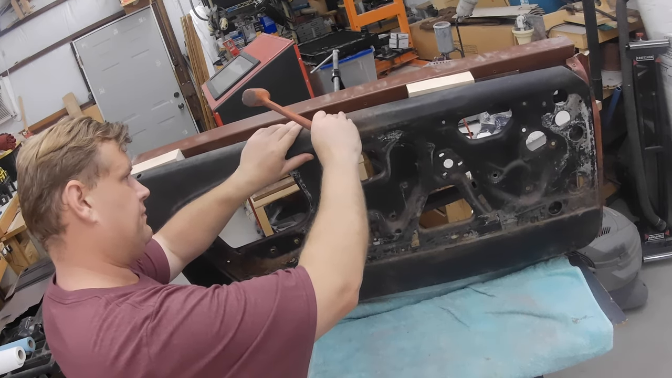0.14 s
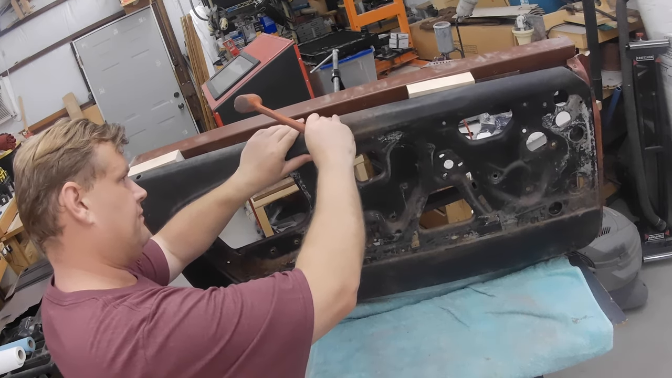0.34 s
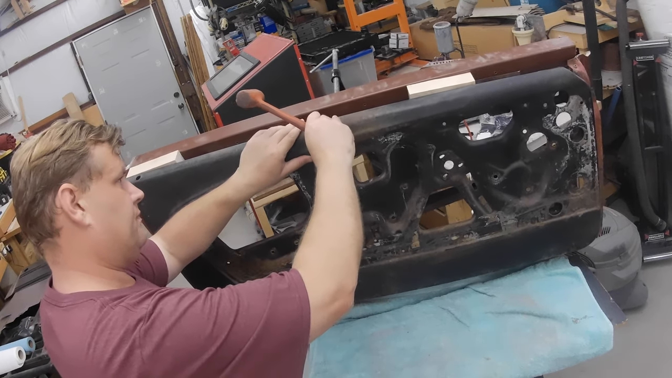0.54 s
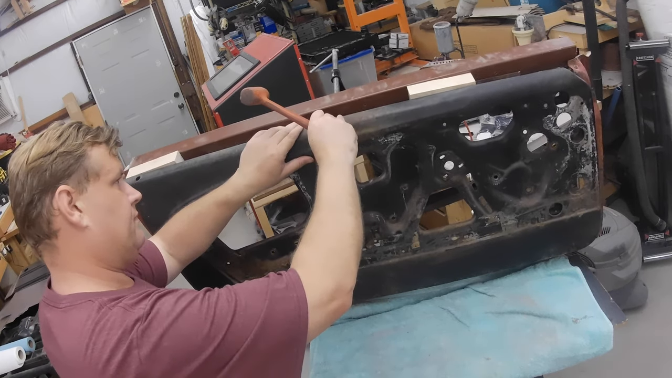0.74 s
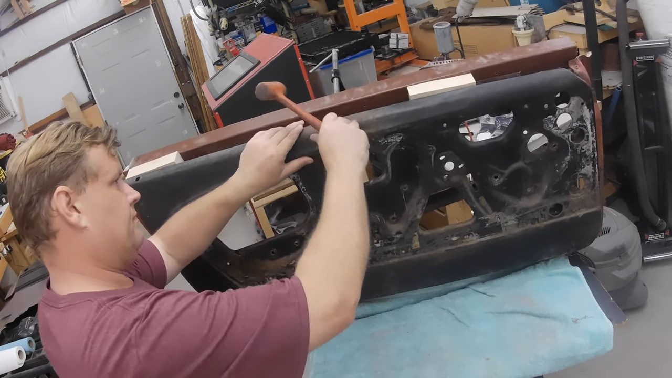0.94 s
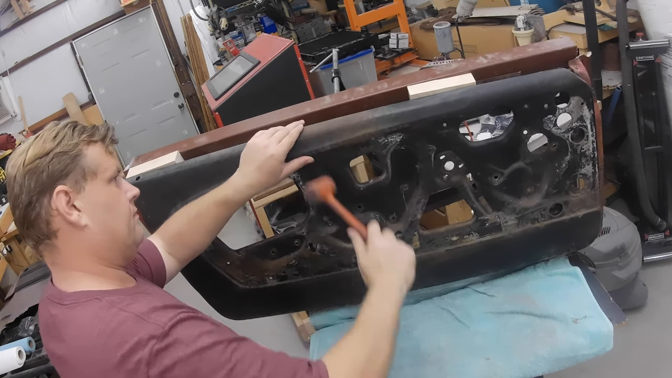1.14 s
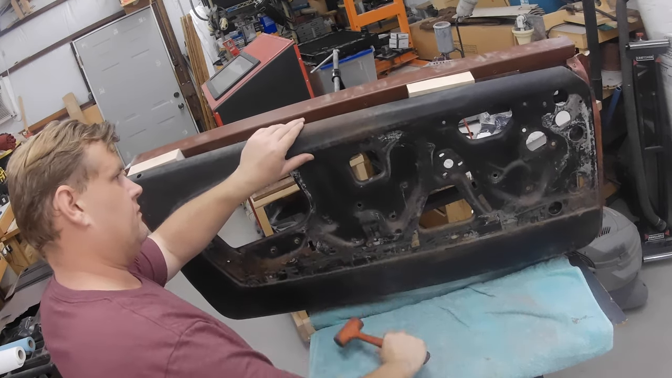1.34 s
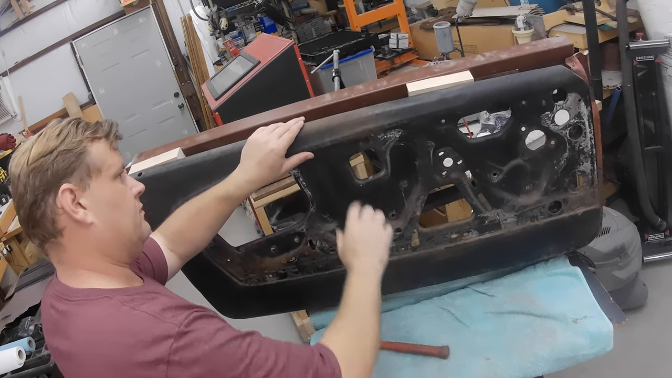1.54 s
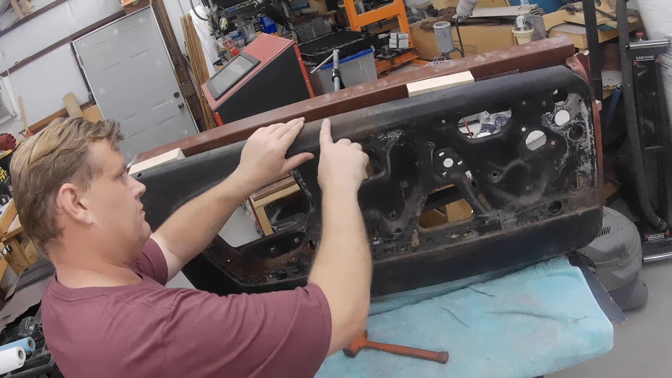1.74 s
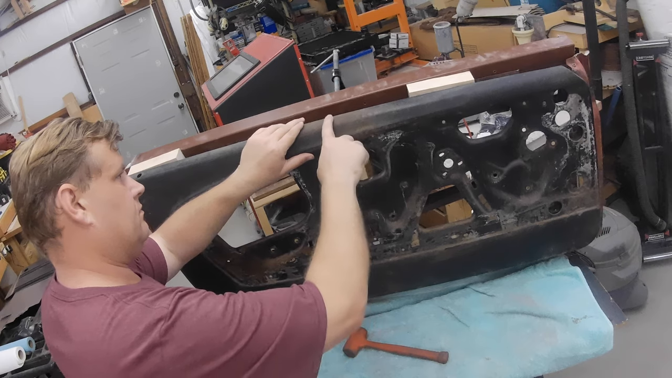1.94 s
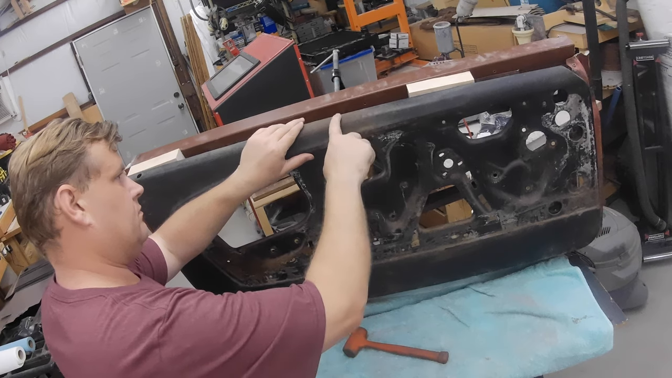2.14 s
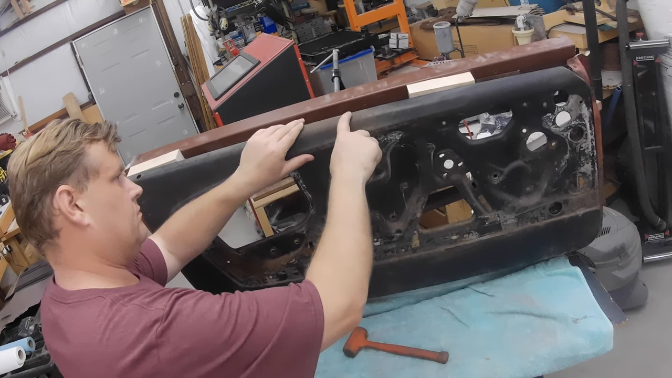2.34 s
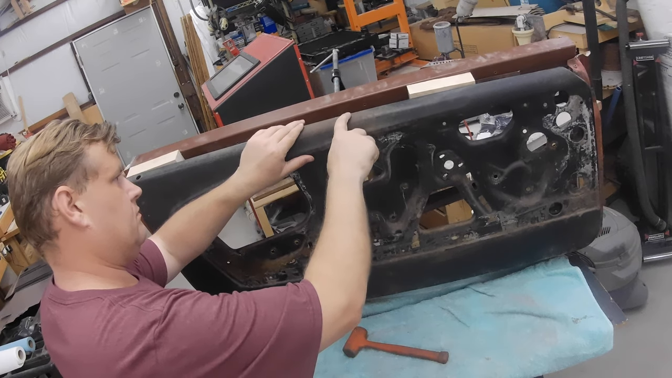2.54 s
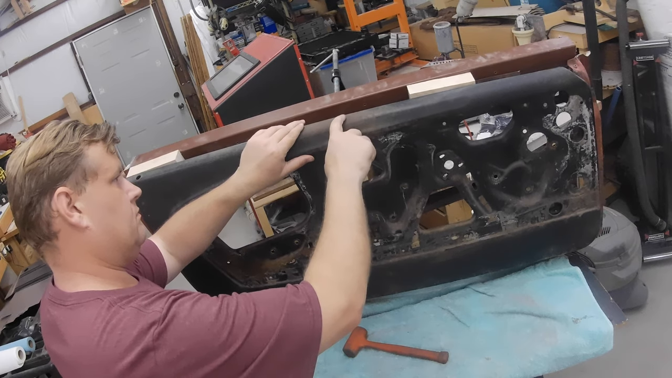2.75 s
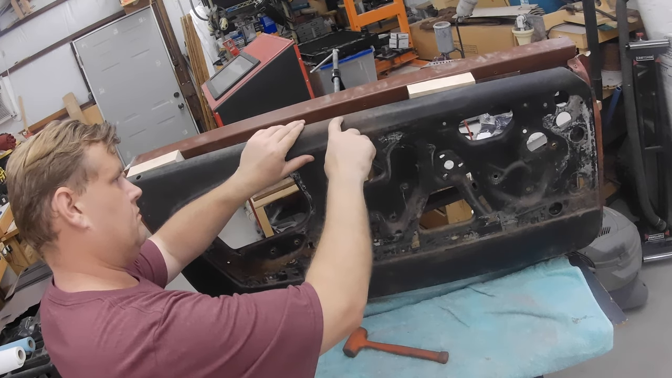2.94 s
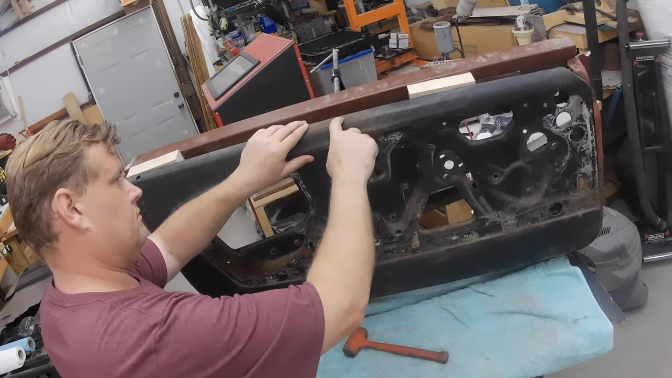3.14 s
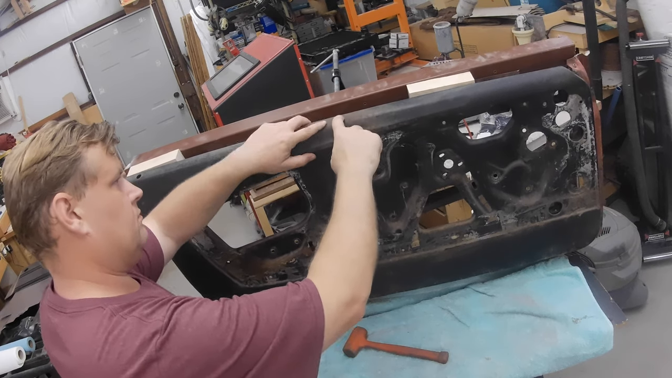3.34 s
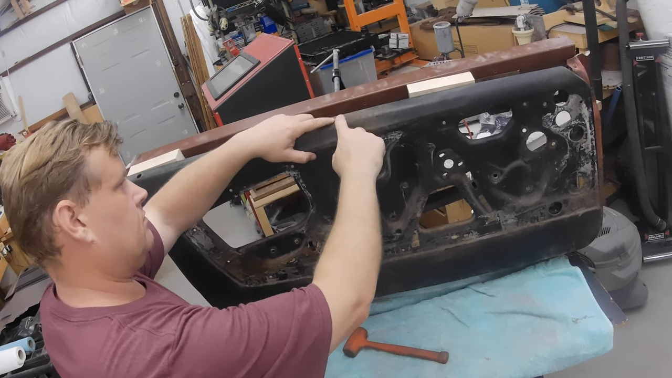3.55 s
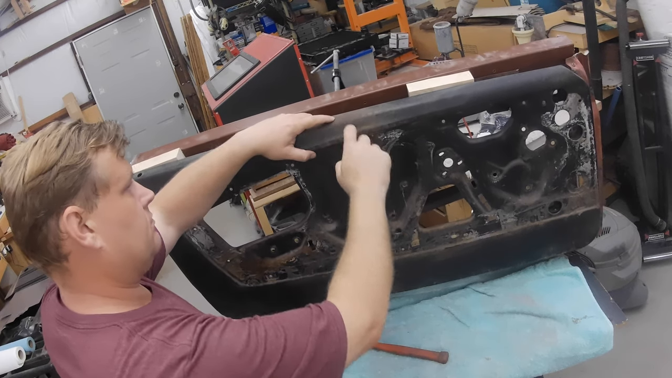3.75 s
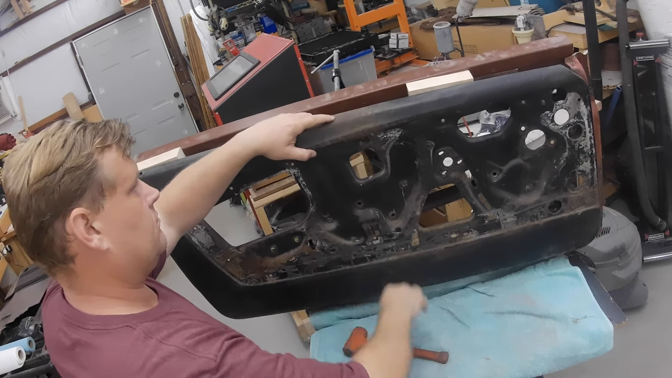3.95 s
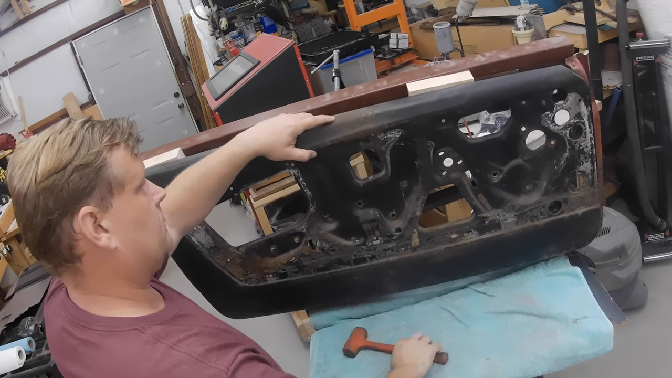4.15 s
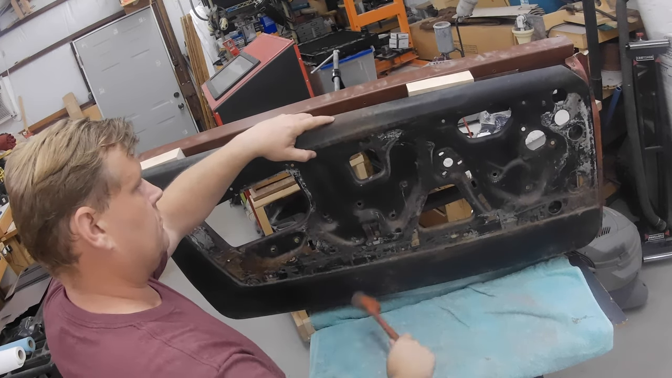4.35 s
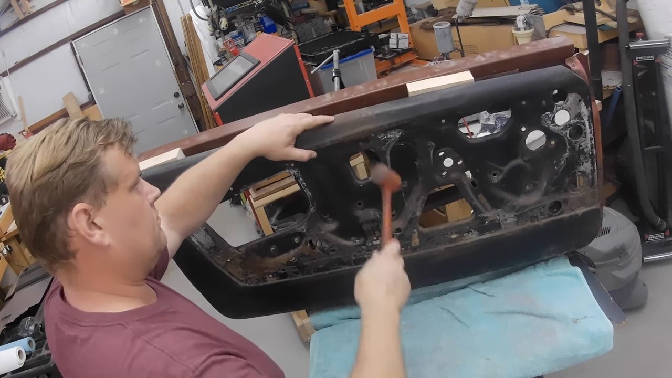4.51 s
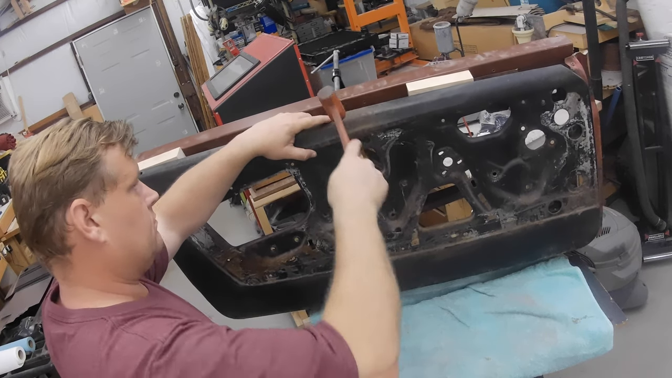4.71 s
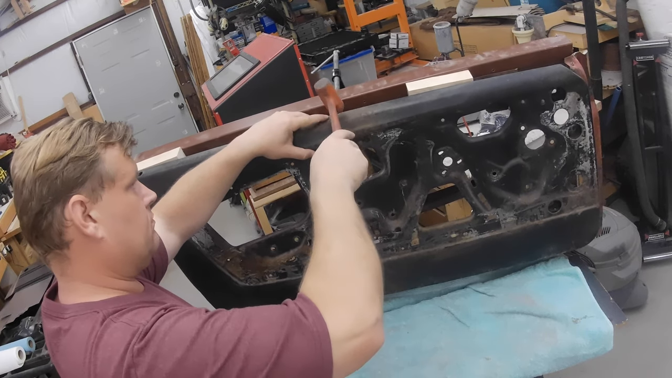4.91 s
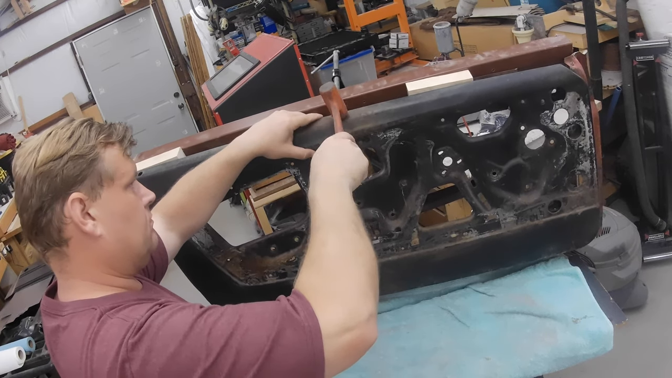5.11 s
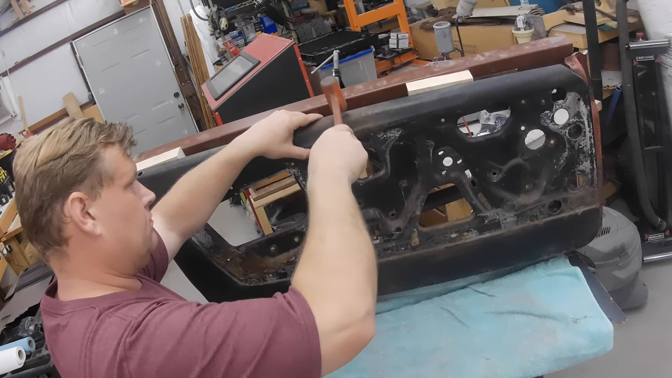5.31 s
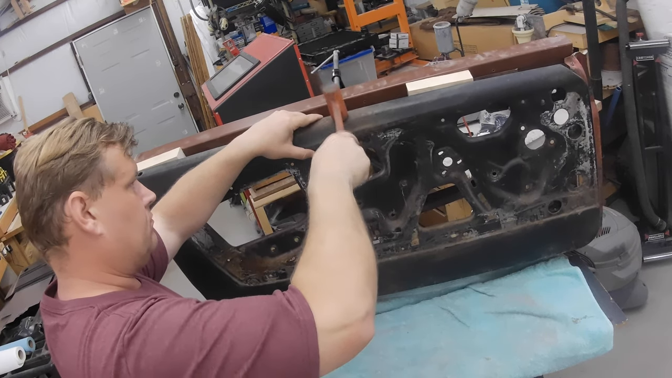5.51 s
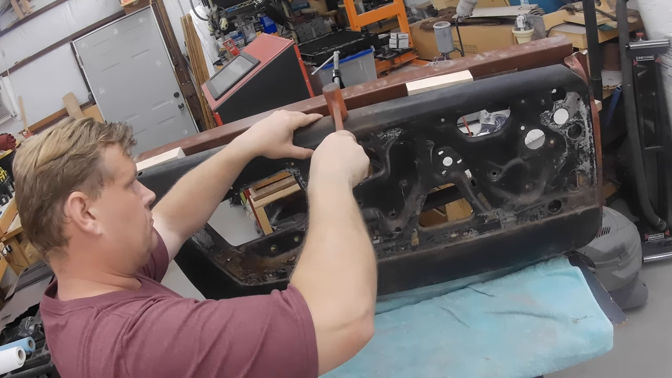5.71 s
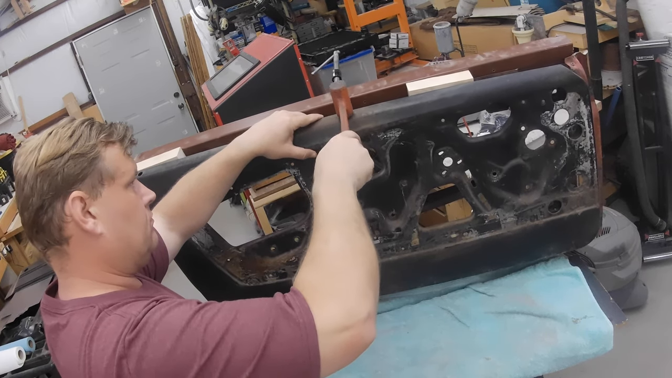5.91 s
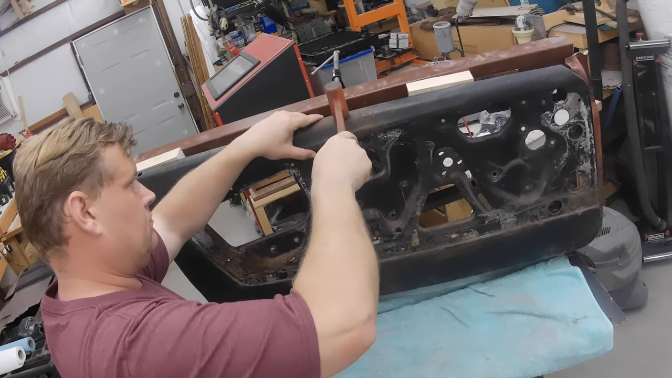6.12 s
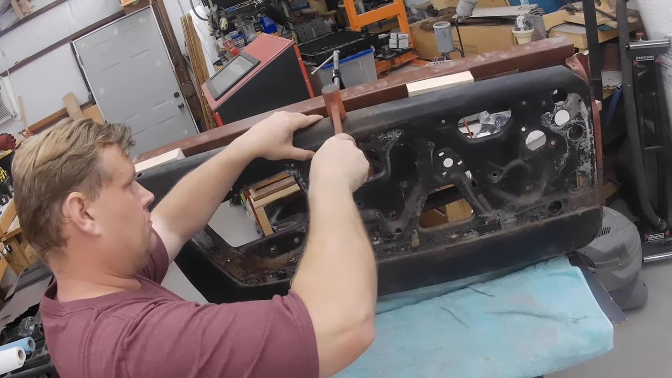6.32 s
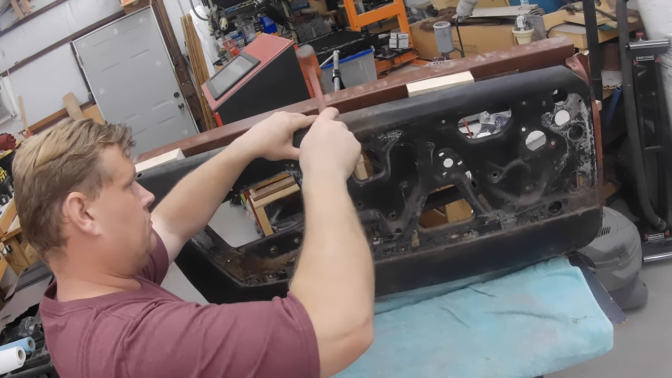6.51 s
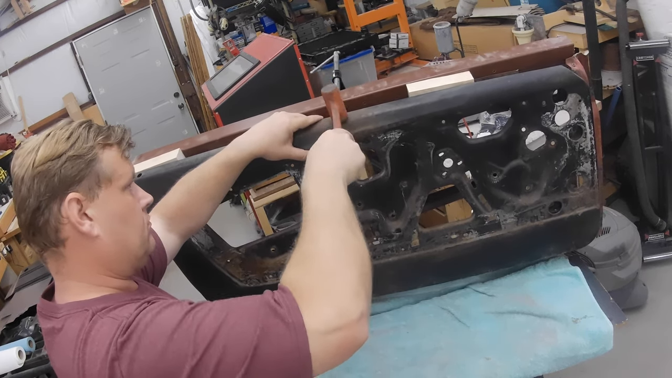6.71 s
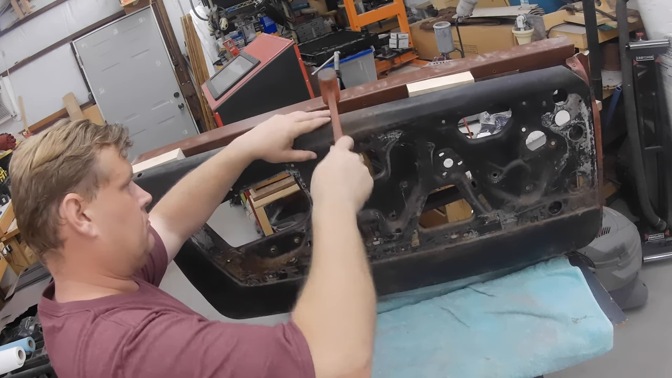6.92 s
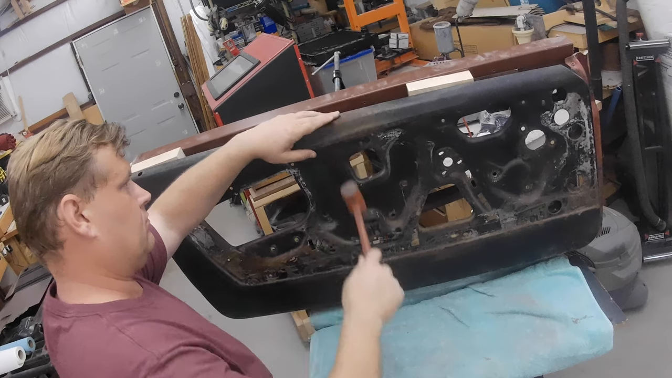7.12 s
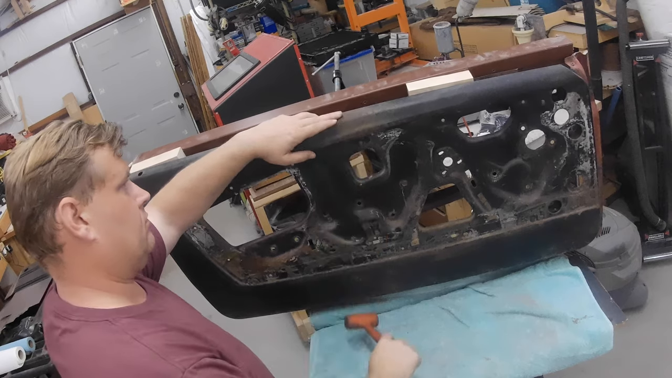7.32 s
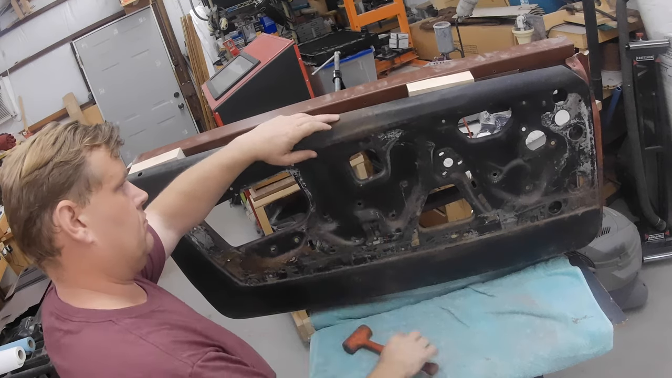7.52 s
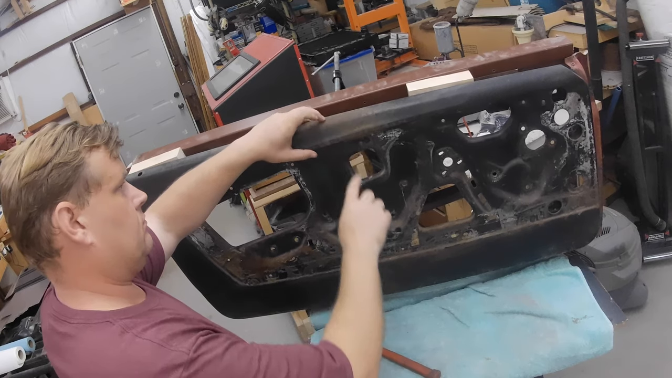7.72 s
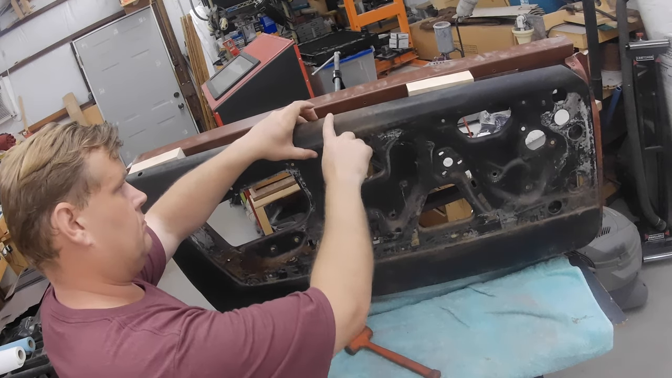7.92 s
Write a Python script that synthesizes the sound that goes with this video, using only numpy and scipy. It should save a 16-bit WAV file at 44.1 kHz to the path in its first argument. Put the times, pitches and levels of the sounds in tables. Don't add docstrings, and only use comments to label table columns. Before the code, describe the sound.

Quiet workshop hum and soft handling knocks, then light taps lead into two hard, overloaded hammer blows on a hollow steel panel.

```python
import sys
import numpy as np
from scipy import signal
from scipy.fft import rfft, irfft
from scipy.io import wavfile
from scipy.ndimage import uniform_filter1d

SR = 44100
rng = np.random.default_rng(int(sys.argv[2]) if len(sys.argv) > 2 else 0)


def transcribe(u):
    v = np.clip(np.atleast_2d(u).T, -1, 1)
    q = np.round(v * 32767).astype(np.int16)
    wavfile.write(sys.argv[1], SR, q)


def makeup_ratio(level_db):
    decades = np.asarray(level_db, float) / 20
    return 10 ** decades


N = 351168


def band(x, hz, width):
    edges = np.clip([hz - width / 2, hz + width / 2], [hz / 4, 0], [hz * .98, .45 * SR])
    y = signal.sosfilt(signal.butter(2, edges, "band", fs=SR, output="sos"), x)
    return y / np.std(y)


def walk(rate):
    k = int(SR / rate)
    held = np.repeat(rng.standard_normal(N // 40)[:N // k + 1], k)[:N]
    return 1.3 * uniform_filter1d(uniform_filter1d(held, k), k)


def fade(t, rise, t60):
    return (1 - np.exp(-t / max(rise, 1e-4))) * 1000. ** (-t / t60)


def add(out, x, s):
    i = int(s * SR)
    out[i:i + len(x)] += x[:N - i]


RING_RISE_S = .0012
# frequency in Hz,
# level in dB, t60 in seconds.
RING = [(209, -25, 2.3), (217, -29.5, 1.8), (291.2, -24.5, 2.6), (360.3, -6, 0.38), (393.5, -16.5, 0.69),
        (411.4, -27.5, 0.74), (363, -24, 0.91), (478, -20.5, 0.22), (487.3, -13.5, 0.35),
        (577.3, -12, 0.45), (608, -15, 0.091), (670.3, -15, 0.27), (735, -9.5, .25), (773, -15.5, 0.47),
        (865, -10.5, 0.11), (904, -11, 0.053), (1052, -13.5, 0.26), (1137, -11.5, 0.23), (1130, -10, 0.14),
        (1168.4, -8.5, .25), (1225, -20, 0.21), (1351, -17.5, .22), (1577, -30.5, 0.15),
        (1923, -24.5, 0.2), (2636, -27.5, .22), (3052, -28, .33), (3550, -27, .2), (4140, -28.5, 0.32),
            (4780, -28.5, .3)]


def panel_modes(t, low_db):
    out = np.zeros(len(t))
    for hz, db, t60 in RING:
        weight_db = low_db if hz < 320 else 0.99 * walk(35)[:len(t)]
        out -= makeup_ratio(db + weight_db) * np.sin(2 * np.pi * hz * t) * fade(t, RING_RISE_S, t60)
    return out


# frequency in Hz, level in dB, t60 in seconds.
THUD = [(146, -17.5, .15), (236.6, -15, 0.17), (285.1, -7.5, .16)]


def rocking(t):
    return -sum(makeup_ratio(db) * np.sin(2 * np.pi * hz * t) * fade(t, RING_RISE_S, t60) for hz, db, t60 in THUD)


# frequency in Hz, level at the blow in dB, t60 in seconds.
CLANG = [(100, -40, 0.19), (165.4, -22, 0.17), (276, -14, 0.23), (382, -11.5, 0.28), (612, -7.5, 0.3),
         (1100, -3, 0.24), (1500, -7.5, 0.17), (2240, -16, 0.2), (3240, -18.5, 0.2), (4000, -11.5, 0.25),
         (5310, -14, 0.12), (6740, -20.5, 0.06), (9110, -19.5, 0.16), (12800, -57, .08)]


def clang(t):
    out = np.zeros(len(t))
    table_hz, table_db, table_t60 = np.transpose(CLANG)
    for hz in 90 * 2 ** np.arange(0, 7.4, 1 / 3):
        db = np.interp(np.log(hz), np.log(table_hz), table_db)
        t60 = np.interp(np.log(hz), np.log(table_hz), table_t60)
        early = fade(t, 0.00074, t60)
        late = makeup_ratio(-23.5) * fade(t, 0.017, 2.7 * t60)
        out += makeup_ratio(db) * (early + late) * band(rng.standard_normal(len(t)), hz, hz / 4)
    return out


BLOW_DB, HARD_DB = 0.5, -20
FIRST_GAIN, FIRST_T60_S = 1.5, .13
# start in seconds, strength in dB, contact in ms,
# level of the long low ring in dB.
BLOWS = [
    (5.219, -31, 3.2, 6.5),
    (5.275, -38.5, 3.2, -1),
    (5.5847, -3, 0.12, -5),
    (6.33, -33.5, 4.4, -2),
    (6.6791, -2.5, 0.11, -2.5),
]


def door():
    out, t = np.zeros(N), np.arange(2 * SR) / SR
    for s, blow_db, contact_ms, low_db in BLOWS:
        x = panel_modes(t, low_db) + rocking(t) + clang(t)
        x *= 1 + FIRST_GAIN * 1000. ** (-t / FIRST_T60_S)
        x *= 1 - np.exp(-t / (contact_ms * .003))
        push = np.exp(-t[:800] / (contact_ms / 1000 / 2 / np.pi))
        struck = np.convolve(x, push / push.sum())[:len(t)]
        add(out, makeup_ratio(BLOW_DB + blow_db) * struck, s)
    return out


def hard_blows():
    return [s for s, db, *_ in BLOWS if db > HARD_DB]


UNSTABLE_FROM_S, UNSTABLE_UNTIL_S, RAIL = .0012, .0312, 1.1
SQUEAL_DB, SQUEAL_HZ, SQUEAL_RISE_HZ_PER_MS = 1, 8300, 1900
SQUEAL_MS, SQUEAL_SPREAD, REST_MS = 1.0, .35, .6
SWING, SWING_END, SWING_TAU_S = 2.5, 1.3, .012


def squeals(x):
    out, wobble_hz = np.zeros(N), 1500 * walk(1000)
    for blow_s in hard_blows():
        start, free = int(blow_s * SR), UNSTABLE_FROM_S * SR
        over = np.abs(x[start:start + int(UNSTABLE_UNTIL_S * SR)]) > RAIL
        chance = iter(rng.standard_normal((40, 2)))
        for i in np.flatnonzero(over[:-1] & ~over[1:]):
            if i < free:
                continue
            pitch_chance, length_chance = next(chance)
            ms = SQUEAL_MS * np.exp(SQUEAL_SPREAD * length_chance)
            t = np.arange(int(ms * SR / 1000)) / SR
            hz = SQUEAL_HZ * (1 + 0.039 * pitch_chance) + SQUEAL_RISE_HZ_PER_MS * 1000 * t
            hz = hz + wobble_hz[start + i:][:len(t)]
            swing = SWING_END + (SWING - SWING_END) * np.exp(-i / SR / SWING_TAU_S)
            envelope = -np.sign(x[start + i]) * np.sqrt(1 - t * 900 / ms)
            burst = envelope * np.sin(2 * np.pi * np.cumsum(hz) / SR)
            add(out, swing * burst, (start + i) / SR)
            free = i + len(t) + REST_MS * SR / 1000
    return makeup_ratio(SQUEAL_DB) * out


KNOCK_RISE, KNOCK_NOISE = 0.28, .6
# start in seconds, centre in Hz, width in Hz,
# level in dB, t60 in seconds.
KNOCKS = [(1.438, 790, 200, -41, 0.073), (1.475, 1310, 1500, -50, 0.17), (1.600, 296, 199, -35, 0.23),
          (1.605, 51, 40, -28, 1), (1.603, 4000, 2500, -55.5, 0.055), (1.722, 1100, 394, -41.5, 0.39),
          (1.722, 1880, 900, -52.5, 0.3), (4.03, 288, 40.3, -47, 0.44), (4.041, 50, 40, -41, 0.33),
          (5.222, 239, 120, -37.5, 0.44), (5.226, 372.4, 90.3, -38.5, .4)]


def knocks():
    out, t = np.zeros(N), np.arange(SR) / SR
    for s, hz, width, db, t60 in KNOCKS:
        tone = np.sin(2 * np.pi * hz * t) * np.exp(-t * width / 2)
        rattle = KNOCK_NOISE * band(rng.standard_normal(SR), hz, width)
        add(out, makeup_ratio(db + 3) * fade(t, KNOCK_RISE / width, t60) * (tone + rattle), s)
    return out


RUSTLE_HZ, RUSTLE_WIDTH_HZ, RUSTLE_TAIL = 3900, 1800, 7
# start in seconds, level in dB, rise in seconds.
RUSTLES = [
    (3.328, -53, 0.12),
    (5.232, -52, 0.023),
    (6.238, -57, 0.11),
    (7.72, -54.5, .08),
]


def rustles():
    out, t = np.zeros(N), np.arange(SR) / SR
    for s, db, rise in RUSTLES:
        noise = band(rng.standard_normal(SR), RUSTLE_HZ, RUSTLE_WIDTH_HZ)
        add(out, makeup_ratio(db) * fade(t, rise, RUSTLE_TAIL * rise) * noise, s)
    return out


# frequency in Hz, level in dB rms, wander in dB.
HUM = [(18, -46, 2), (57.7, -52.5, 3), (94.4, -46.5, 1.5), (120.2, -40.5, 1.22), (186.2, -45.5, 2),
       (242.4, -59.5, 0.5), (373, -59, 2)]


def fan_and_hum():
    t, out = np.arange(N) / SR, np.zeros(N)
    for hz, db, wander_db in HUM:
        level = np.sqrt(2) * makeup_ratio(db + wander_db * (walk(3.4) + walk(20)))
        out += level * np.sin(2 * np.pi * (hz * t + 0.024 * walk(5.4)))
    return out


AIR_DB = -40.5
FRAME_HZ, FLUTTER_DB = 30, 3.5
# frequency in Hz, density in dB per Hz.
AIR = [(30, -9.5), (70, 1.5), (140, -8.5), (230, -10), (300, -22.5), (410, -13.5), (750, -17), (1550, -25),
       (2100, -37), (5100, -44), (5500, -52.5), (9400, -60), (10100, -74), (15600, -85)]
# centre in Hz, width in Hz, level in dB.
HOUSING = [(614, 45, -4.5), (3760, 230, 5), (8830, 490, 17), (11000, 600, 12), (13500, 1500, 13)]


def moving_air():
    t = np.arange(N) / SR
    f = np.maximum(np.arange(N // 2 + 1) * SR / N, 1)
    hz, db = np.transpose(AIR)
    spectrum = rfft(rng.standard_normal(N)) * makeup_ratio(np.interp(np.log(f), np.log(hz), db))
    spectrum *= makeup_ratio(sum(d * np.exp(-((f - c) / w) ** 2 / 2) for c, w, d in HOUSING))
    throb_db = FLUTTER_DB * np.sin(2 * np.pi * (FRAME_HZ * t + .3))
    air = np.zeros(N)
    for octave in np.arange(3, 15):
        share = np.cos(np.pi / 2 * np.clip(np.log2(f) - octave, -1, 1)) ** 2
        flicker_db = 1.6 * walk(27) + throb_db if octave > 12 else 1.1 * walk(4)
        air += makeup_ratio(flicker_db) * irfft(spectrum * share, N)
    return makeup_ratio(AIR_DB) * air / np.std(air)


def scene():
    return (door() + knocks() + rustles() + fan_and_hum() + moving_air())[None]


CALM_DB, RICH_DB, STARVED_DB = 11, 23.5, -4.5
RICH_FROM_S, RICH_UNTIL_S, DROP_S, SINK_S, RECOVER_S = -.037, .035, .03, .045, .08
STARVED_UNTIL_S = [6.16, 7.15]


def precision_db(t):
    db = np.full(len(t), float(CALM_DB))
    for blow_s, until_s in zip(hard_blows(), STARVED_UNTIL_S):
        rich, poor = blow_s + RICH_FROM_S, blow_s + RICH_UNTIL_S + DROP_S
        times = [rich - RECOVER_S / 2, rich, poor - DROP_S, poor, poor + SINK_S, until_s, until_s + RECOVER_S]
        steps = [CALM_DB, RICH_DB, RICH_DB, STARVED_DB + 5, STARVED_DB, STARVED_DB, CALM_DB]
        db += np.interp(t, times, steps) - CALM_DB
    return db


HOP, GRID = 941, 860
TILT_DB, SCATTER_DB = 3, .9


def camera_rounding(x):
    n, k = np.arange(2 * HOP)[:, None] + .5, np.arange(HOP) + .5
    basis = np.sqrt(2 / HOP) * np.sin(np.pi * n / HOP / 2) * np.cos(np.pi / HOP * (n + HOP / 2) * k)
    padded = np.pad(x, (HOP - GRID, 2 * HOP))
    frames = padded[np.arange(N // HOP + 1)[:, None] * HOP + np.arange(2 * HOP)]
    c = frames @ basis
    fine_db = precision_db((np.arange(len(c)) * HOP + GRID) / SR)[:, None]
    scatter = np.repeat(rng.standard_normal((len(c), HOP // 16 + 1)), 16, axis=1)[:, :HOP]
    hz = k * SR / 2 / HOP
    fine_db = np.maximum(fine_db + SCATTER_DB * scatter - TILT_DB * np.log2(hz / 1000), -9.3)
    quiet = np.abs(frames).max(axis=1, keepdims=True) < .3
    valley = (hz > 5250) & (hz < 8100) | (hz > 9700)
    fine_db = np.where(quiet & valley, -8.5, fine_db)
    local_power = np.abs(uniform_filter1d(c ** 2, size=16, axis=1))
    step = np.sqrt(local_power + 1e-18) * makeup_ratio(-fine_db)
    rounded = np.sign(c) * np.floor(np.abs(c) / step + .4) * step
    y = rounded @ basis.T
    out = np.pad(y[:, :HOP], ((0, 1), (0, 0))) + np.pad(y[:, HOP:], ((1, 0), (0, 0)))
    return out.ravel()[HOP - GRID:][:N]


def top_cut(x):
    return signal.sosfilt(signal.butter(12, 15750, fs=SR, output="sos"), x)


CLIP, KNEE = .93, 6
INPUT_HZ, TOP_HZ = [35, 12900], 15600


def record(dry):
    x = dry[0] + squeals(dry[0])
    x = x / (1 + np.abs(x / CLIP) ** KNEE) ** (1 / KNEE)
    x = signal.sosfilt(signal.butter(1, INPUT_HZ, "band", fs=SR, output="sos"), x)
    x = signal.sosfiltfilt(signal.ellip(6, .2, 30, TOP_HZ, fs=SR, output="sos"), x)
    mix = camera_rounding(x)[None]
    return top_cut(mix)


dry = scene()
out = record(dry)
transcribe(out)
```